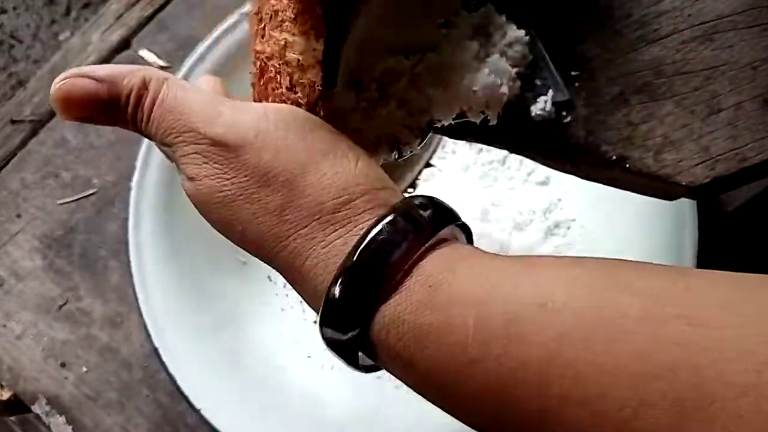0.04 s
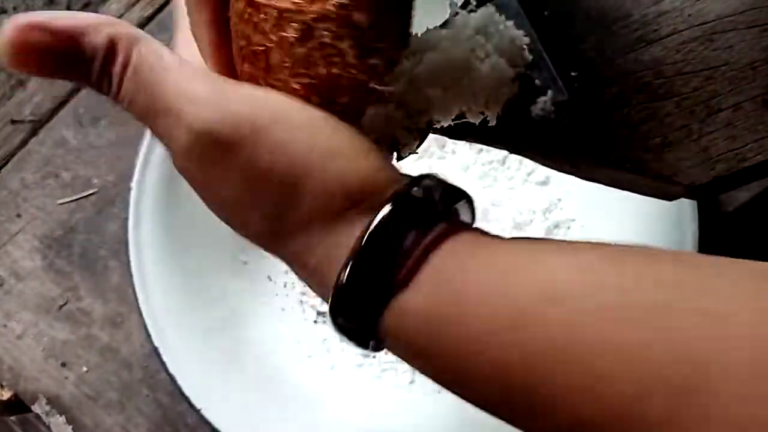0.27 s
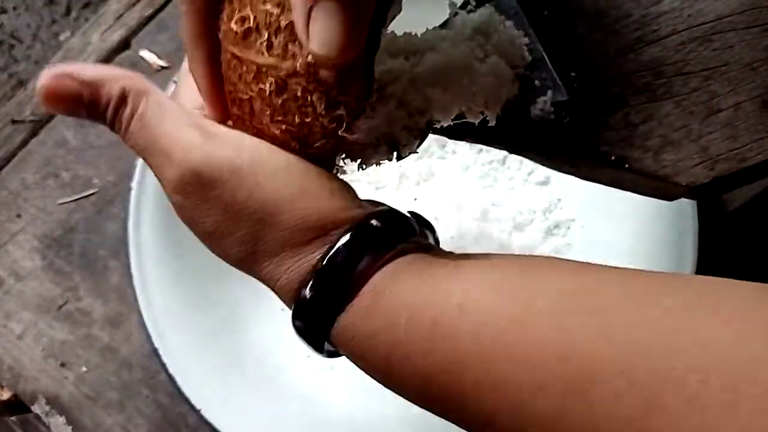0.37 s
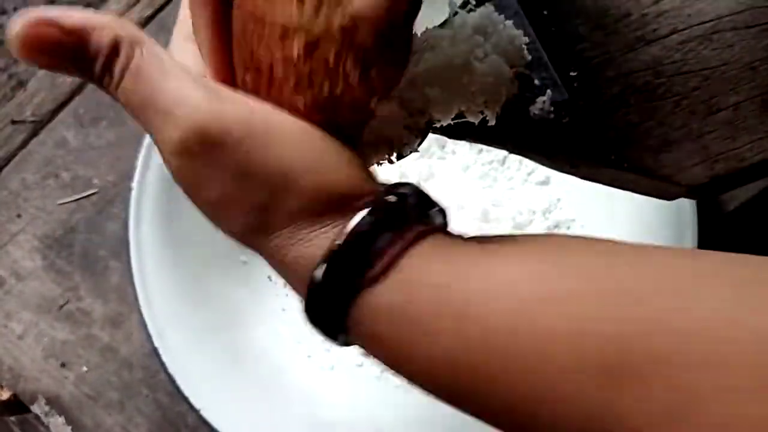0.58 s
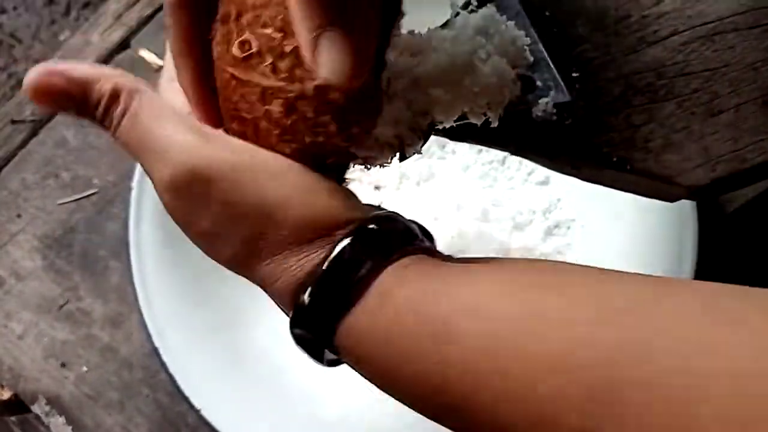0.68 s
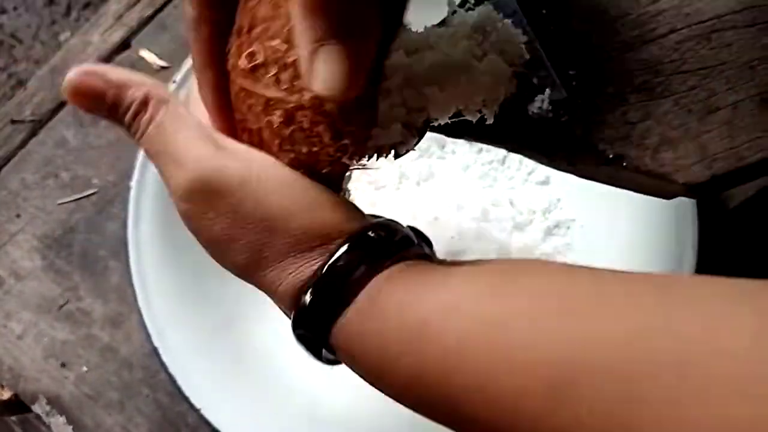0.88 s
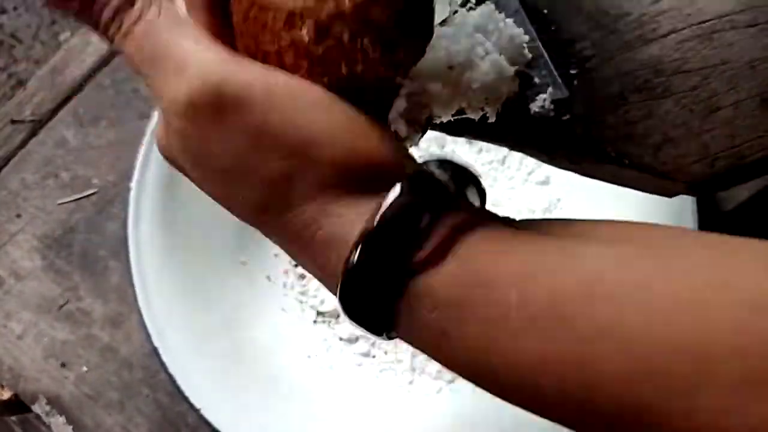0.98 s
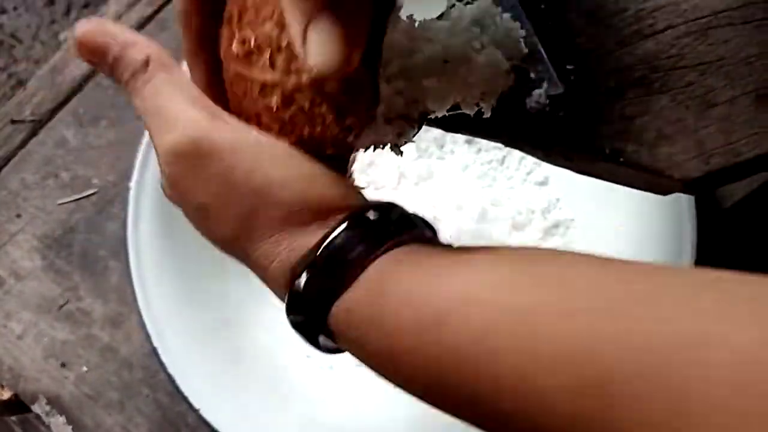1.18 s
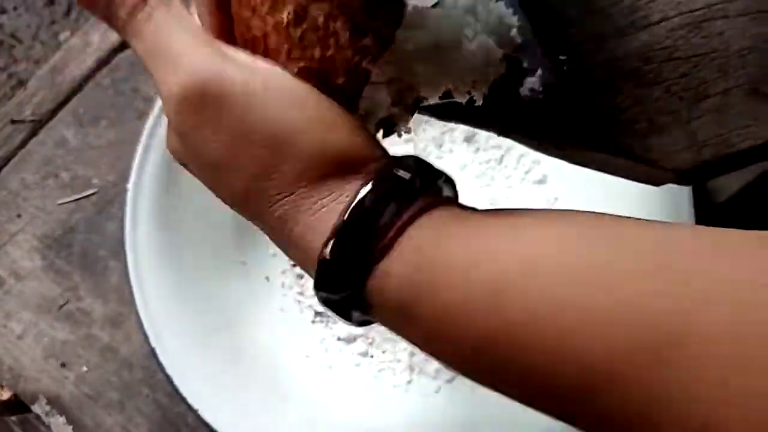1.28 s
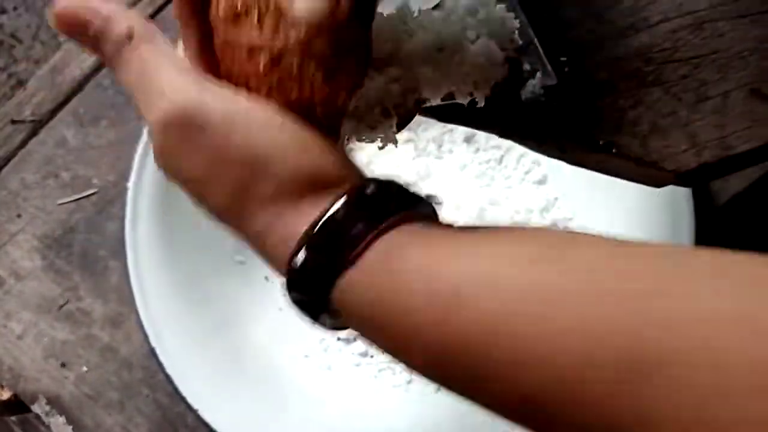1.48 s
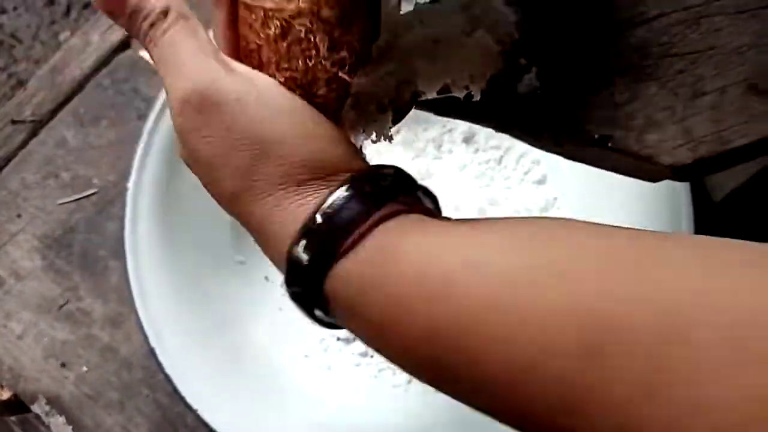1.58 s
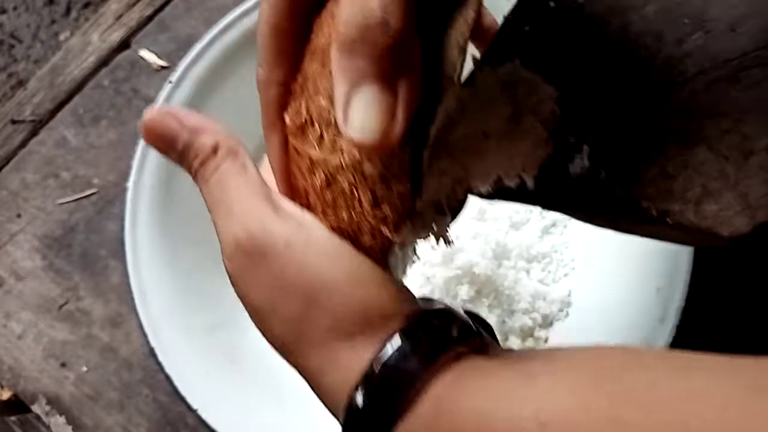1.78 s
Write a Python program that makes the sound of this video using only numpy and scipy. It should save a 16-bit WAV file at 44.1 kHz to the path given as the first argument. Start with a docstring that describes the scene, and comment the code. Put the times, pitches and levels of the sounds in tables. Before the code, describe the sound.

Coconut grating up close: six short, gritty scrapes on a serrated metal blade, with dull bench thuds

```python
"""A light scrape and a touch-down, then six rasping pushes: half a coconut over a toothed steel blade on a
wooden bench, close to a two-port recorder. Dense random clicks in hiss, coloured as torn flesh, drive modes of
shell, bench, cup and blade. Light landings and drags fall around the pushes; short pulses make the knocks.
Faint gliding sines squeak, a last rustle of fine grains fades; a short noise-tail room and faint air lie under."""
import sys
import numpy as np
from scipy import signal
from scipy.fft import rfft, irfft, next_fast_len
from scipy.io import wavfile
from scipy.ndimage import uniform_filter1d

SR = 44100
rng = np.random.default_rng(int(sys.argv[2]) if len(sys.argv) > 2 else 0)


def decibels_to_gain(level_db):
    """Convert a level in decibels to a linear amplitude gain (20 dB per decade)."""
    exponent = np.asarray(level_db, float) / 20
    return 10 ** exponent


def to_wav(sig):
    """Store sig (one row per channel, or 1-D mono) as 16-bit WAV at the path in sys.argv[1].

    Samples outside -1..1 are clipped; the rate is SR.
    """
    pcm = np.clip(np.atleast_2d(sig), -1, 1) * 32767
    pcm = np.round(pcm).astype(np.int16)
    wavfile.write(sys.argv[1], SR, pcm.T)  # frames by channels


N = 81585

# Levels are relative: port gain and filters follow. Spectra and modes are scaled to energy 1.
# Air noise spectrum: f/Hz, level/dB per Hz
AIR_SPECTRUM = [(30, -4), (150, 0), (400, -6), (1200, -14), (3000, -17), (9000, -15), (15500, -22)]
AIR_DB = -80
# Room decay: f/Hz, t60/s
ROOM_T60 = [(150, 0.2), (600, 0.4), (1300, 0.15), (2000, 0.28), (10000, 0.13)]
ROOM_DB = -15.5

# Last rustle spectrum: f/Hz, level/dB per Hz
SETTLE_SPECTRUM = [(100, -1.5), (350, -1.5), (700, -13.5), (1150, -11), (1450, -19), (2300, -22),
                   (3300, -31), (5000, -26.5), (9000, -26), (11000, -36), (15000, -42)]
SETTLE_START_S, SETTLE_RISE_S, SETTLE_DB, SETTLE_FADE_DB_PER_S = 1.59, 0.018, -55, -46

# Faint thin tones, perhaps shell squeaks: start/s, length/s, first f/Hz, last f/Hz, level/dB
SQUEAKS = [(.684, .024, 1020, 1060, -41), (1.105, .045, 940, 1140, -62), (1.315, .12, 2960, 2945, -56),
           (1.385, .04, 990, 1120, -65), (1.715, .035, 990, 1280, -64), (1.742, .1, 1280, 1215, -62),
           (1.824, .02, 1190, 1185, -56)]
SQUEAK_WAVER_RMS, SQUEAK_FADE_DB_PER_CYCLE = 0.25, -0.04

# Blows: t/s, level/dB
KNOCKS = [(0.23, -33.5), (0.494, -39), (.702, -37.5), (.748, -29.5), (.932, -35.5), (1.199, -21),
          (1.831, -65.5)]
KNOCK_WIDTH_S, KNOCK_CUP_DB = 0.00059, -12.5

# Shell modes: f/Hz, level/dB, t60/s
SHELL_MODES = [(147, -18, .08), (205.4, -19.5, 0.034), (279.2, -1, 0.069), (288, 3, 0.066),
               (409.7, 0, 0.034), (360.2, 2.5, 0.011), (459, -2, 0.067), (612, -10.5, 0.038)]
# Bench modes: f/Hz, level/dB, t60/s
BENCH_MODES = [(60, -1, .3), (74, 11, 0.1), (117.5, -6.5, .3), (143.4, -1, 0.75), (174.7, -3, 0.76),
               (218.2, -4.5, .3), (250.3, 20.5, 0.36), (346, -36, .25), (413, -28, 0.21)]
BENCH_DB = -8.5
# Hollow cup modes: f/Hz, level/dB, t60/s
CUP_MODES = [(1080, -7.5, 0.046), (1238, -1.5, 0.023), (1298.4, -1, 0.026), (1365, -1.5, 0.023)]
PUSH_CUP_DB = -4.5
# Blade modes: f/Hz, level/dB, t60/s
BLADE_MODES = [(1817, -2.5, 0.053), (2168, -2, 0.048), (2670, -4, 0.0067), (4230, -10, 0.004),
               (6570, 6, .006), (7940, 2, 0.013), (8970, 7, 0.0034)]
BLADE_DB = -5.5

# Pushes, one list each: t/s, tearing level/dB, shell load/dB over the tearing (capped below)
PUSHES = [
    [(0.2, -34, 2.5), (0.21, -43, 4), (0.22, -39, 2.5), (0.256, -35, 4.5), (0.28, -40.5, 4),
     (0.305, -77, 3)],
    [(0.415, -44, -20), (0.423, -46.5, 2), (0.447, -38.5, 2), (0.507, -32, 2.5), (0.531, -39.5, 2),
     (0.57, -77, 20)],
    [(0.675, -46.5, -25), (0.685, -40.5, 4.5), (0.703, -38.5, 5), (0.731, -31, -2.5), (0.759, -32, 6),
     (0.791, -42, 0.5), (0.821, -80, 10), (0.83, -69, 20)],
    [(0.93, -52.5, -24), (0.94, -44, 15.5), (0.956, -35, 0), (1.008, -30.5, 2.5), (1.04, -38, 2.5),
     (1.085, -75.5, 3)],
    [(1.2, -44, 67), (1.23, -34.5, -30), (1.242, -31, -2), (1.272, -32, 1.5), (1.308, -38, 4),
     (1.36, -74, 14.5)],
    [(1.465, -40, 12), (1.475, -45, 0), (1.559, -36, 5.5), (1.587, -46.5, 9), (1.595, -72, 18),
     (1.615, -66, 33)],
]
SHELL_LOAD_MAX_DB = 14
# Nut set on the blade before a push: start/s, length/s, level/dB, shell/dB over it
LANDINGS = [(0.157, 0.043, -48.5, 4), (0.644, 0.03, -57.5, 7.5), (0.9, 0.017, -48.5, 5.5),
            (1.158, 0.027, -46.5, 4), (1.432, 0.019, -49.5, -2.5)]
# Nut dragged back or turned lightly: start/s, length/s, level/dB, cup/dB over it, shell/dB over it
DRAGS = [(0.032, 0.059, -55, 1.5, 0), (0.319, 0.055, -44.5, -2, -4), (0.386, 0.014, -46, -10, -2),
         (0.573, 0.023, -43.5, 2, -6.5), (0.832, 0.012, -49.5, 4.5, -11), (1.092, 0.019, -54, -0.5, -4.5),
         (1.362, 0.024, -52, -2.5, -12)]
TOUCH_RISE_S, TOUCH_LIFT_TAU_S, TOUCH_FADE_DB_PER_S = 0.006, 0.0055, -45
# Tearing spectrum: f/Hz, level/dB per Hz
TEAR_SPECTRUM = [(100, -37), (500, -23.5), (750, -5), (1050, -0.5), (1500, -3.5), (1900, 3.5), (2450, -4),
                 (2900, -8), (3400, -8.5), (4400, -7), (5900, -6), (7500, -8), (9000, -5), (10400, -10.5),
                 (11500, -14.5), (12500, -14.5), (13800, -13.5), (14600, -10), (15500, -10.5)]
# Light drag spectrum: f/Hz, level/dB per Hz
RUB_SPECTRUM = [(100, 6), (400, -1.5), (750, -9), (1100, -10), (1700, -33), (2300, -12), (2900, -15.5),
                (3500, -9.5), (4300, -20.5), (4650, -0.5), (5000, -11.5), (6500, -8), (9000, -10),
                (10500, -14), (13500, -21), (15200, -11)]
CLICKS_PER_S, CLICK_SPREAD_DB, HISS_SHARE = 5000, 8.5, 0.63
JUDDER_RMS_DB, JUDDER_CUTOFF_HZ = 0.5, 162
PATCH_RMS_DB, PATCH_BINS, PATCH_FRAMES = 3, 3, 20

# Port level difference: f/Hz, left over right/dB
LEFT_OVER_RIGHT = [(60, -4.5), (600, -8.5), (1000, -3.5), (1300, -17.5), (1700, 4.5), (2150, -16),
                   (2600, 2), (4000, -2), (6800, -3.5), (7800, -17.5), (9000, -12), (10400, -10),
                   (12000, -24.5), (13500, -35), (15000, -37)]
# Port likeness: f/Hz, share of the right-port signal in the left (0-1)
LIKENESS = [(40, .85), (200, .98), (600, .92), (800, .4), (1000, .7), (1350, .4), (1600, .85), (2600, .9),
            (3100, .45), (4100, .75), (5000, .35), (9000, .3)]
# Left port lead: f/Hz, phase/rad
LEFT_LEAD = [(0, 0), (650, 3.1), (900, 4.8), (1250, 4.6), (1600, 3.5), (2150, 3.4), (2400, 6.1), (2900, 8),
             (4100, 12.6), (4300, 12.9), (16000, 60)]
PORT_GAIN_DB, LOW_CUT_HZ, TOP_CUT_HZ = 4.5, 100, 15760


def evened(x):
    """Scales to rms 1."""
    return x / np.sqrt(np.mean(x ** 2) + 1e-20)


def read(points, hz):
    """Reads a table on a log-frequency axis."""
    f, value = np.transpose(points)
    return np.interp(np.log(hz + 1), np.log(f + 1), value)


def coloured(x, points):
    """Minimum-phase filter with the given spectrum, energy 1."""
    level_db = read(points, np.fft.rfftfreq(4096, 1 / SR))
    cepstrum = irfft(np.log(decibels_to_gain(level_db)))
    # fold to the causal side
    cepstrum[1:2048] *= 2
    cepstrum[2049:] = 0
    taps = irfft(np.exp(rfft(cepstrum)))[:2048]
    return signal.oaconvolve(x, taps[None] / np.linalg.norm(taps), axes=1)[:, :N]


def rung(x, modes):
    """A force excites decaying sine modes of alternating sign; whole response has energy 1."""
    t = np.arange(20000) / SR
    ring = np.zeros(len(t))
    for k, (hz, db, t60) in enumerate(modes):
        decay = decibels_to_gain(db - 60 * t / t60) / np.sqrt(t60)
        ring += (-1) ** k * decay * np.sin(2 * np.pi * hz * t)
    return signal.oaconvolve(x, ring[None] / np.linalg.norm(ring), axes=1)[:, :N]


def grit():
    """Two unrelated streams of tooth clicks over hiss, sharing one quick judder."""
    hit = rng.random((2, N)) < CLICKS_PER_S / SR
    size = np.minimum(rng.exponential(1, (2, N)), 4)
    sign = np.sign(rng.standard_normal((2, N)))
    hiss = rng.standard_normal((2, N))
    clicks = evened(hit * decibels_to_gain(CLICK_SPREAD_DB * size) * sign)
    lowpass = signal.butter(2, JUDDER_CUTOFF_HZ, fs=SR)
    judder = evened(signal.lfilter(*lowpass, rng.standard_normal(N)))
    return evened((HISS_SHARE * hiss + (1 - HISS_SHARE) * clicks) * decibels_to_gain(JUDDER_RMS_DB * judder))


def patchy(x):
    """Bands swell and sink as different teeth bite."""
    z = signal.stft(x, nperseg=256, noverlap=192)[2]
    field = rng.standard_normal(z.shape[1:])
    field = uniform_filter1d(field, size=PATCH_BINS, axis=0)
    field = evened(uniform_filter1d(field, size=PATCH_FRAMES, axis=1))
    return evened(signal.istft(z * decibels_to_gain(PATCH_RMS_DB * field), nperseg=256, noverlap=192)[1][:, :N])


def air():
    """Steady coloured noise, unrelated in the two rows."""
    return decibels_to_gain(AIR_DB) * coloured(rng.standard_normal((2, N)), AIR_SPECTRUM)


def room(x):
    """Convolves with a noise tail, each band dying at its own speed."""
    hz, t, z = signal.stft(rng.standard_normal((2, SR // 2)), SR, nperseg=256)
    decay = decibels_to_gain(-60 * t / read(ROOM_T60, hz)[:, None])
    tail = signal.istft(z * decay, SR, nperseg=256)[1]
    return signal.fftconvolve(x, tail / np.linalg.norm(tail[0]), axes=1)[:, :N]


def settling():
    """Fine grains fading out once the nut is lifted."""
    u = np.arange(N) / SR - SETTLE_START_S
    fade = decibels_to_gain(SETTLE_DB + SETTLE_FADE_DB_PER_S * np.maximum(u, 0))
    return coloured(patchy(grit()) * np.clip(u / SETTLE_RISE_S, 0, 1) * fade, SETTLE_SPECTRUM)


def squeaks():
    """Thin sines with linear pitch glides and slightly unsteady level."""
    t, tones = np.arange(N) / SR, np.zeros(N)
    for start, length, first_hz, last_hz, db in SQUEAKS:
        u = np.clip((t - start) / length, 0, 1)
        cycles = length * (first_hz * u + (last_hz - first_hz) * u ** 2 / 2)
        edges = np.minimum(2 * abs(np.sin(np.pi * u)), 1) * (u < 1)
        tones += decibels_to_gain(db + SQUEAK_FADE_DB_PER_CYCLE * cycles) * edges * np.sin(2 * np.pi * cycles)
    waver = evened(uniform_filter1d(rng.standard_normal((2, N)), size=300, axis=1))
    return tones * (1 + SQUEAK_WAVER_RMS * waver)


def knocks():
    """Short soft blows with a rebound ring shell and bench; their slope rings the cup."""
    force, t = np.zeros((2, N)), np.arange(N) / SR
    for s, db in KNOCKS:
        u = ((t - s) / KNOCK_WIDTH_S) ** 2
        force += decibels_to_gain(db) * (2 * u - 1) * np.exp(-u)
    slope = np.gradient(force, axis=1) * KNOCK_WIDTH_S * SR
    wood = rung(force, SHELL_MODES) + decibels_to_gain(BENCH_DB) * rung(force, BENCH_MODES)
    return wood + decibels_to_gain(KNOCK_CUP_DB) * rung(slope, CUP_MODES)


def touch(t, start, length, db):
    """Contact envelope: quick rise, slow fade, quick lift."""
    u = t - start
    edges = np.clip(u / TOUCH_RISE_S, 0, 1) * np.exp(-np.maximum(u - length, 0) / TOUCH_LIFT_TAU_S)
    return edges * decibels_to_gain(db + TOUCH_FADE_DB_PER_S * np.clip(u, 0, length))


def contact():
    """Gains over time with which tearing, light rub, shell and cup are driven."""
    t = np.arange(N) / SR
    tear, rub, shell, cup = np.zeros((4, N))
    for push in PUSHES:
        s, db, load_db = np.transpose(push)
        edges = np.clip(np.minimum(t - s[0], s[-1] - t) / TOUCH_RISE_S, 0, 1)
        level = decibels_to_gain(np.interp(t, s, db)) * edges
        tear += level
        shell += level * decibels_to_gain(np.minimum(np.interp(t, s, load_db), SHELL_LOAD_MAX_DB))
        cup += level * decibels_to_gain(PUSH_CUP_DB)
    for start, length, db, shell_db in LANDINGS:
        level = touch(t, start, length, db)
        tear += level
        shell += level * decibels_to_gain(shell_db)
        cup += level * decibels_to_gain(PUSH_CUP_DB)
    for start, length, db, cup_db, shell_db in DRAGS:
        level = touch(t, start, length, db)
        rub += level
        shell += level * decibels_to_gain(shell_db)
        cup += level * decibels_to_gain(cup_db)
    return tear, rub, shell, cup


def grating():
    """The tooth clicks heard directly and through shell, bench, cup and blade."""
    tear, rub, shell, cup = contact()
    teeth, body = patchy(grit()), grit() * shell
    direct = coloured(teeth * tear, TEAR_SPECTRUM) + coloured(teeth * rub, RUB_SPECTRUM)
    wood = rung(body, SHELL_MODES) + decibels_to_gain(BENCH_DB) * rung(body, BENCH_MODES)
    steel = decibels_to_gain(BLADE_DB) * rung(patchy(grit()) * tear, BLADE_MODES)
    hollow = rung(patchy(grit()) * cup, CUP_MODES)
    return direct + wood + steel + hollow


def scene():
    """Row 0 feeds the right port; row 1 is a twin for the part the left port does not share."""
    near = grating() + knocks()
    return near + decibels_to_gain(ROOM_DB) * room(near) + squeaks() + settling() + air()


def low_pass(x):
    """Removes everything above the highest recorded frequency."""
    return signal.sosfilt(signal.butter(12, 16390, fs=SR, output="sos"), x)


def record(dry):
    """The left port leads in phase, is duller and only partly alike; both lose deep bass and top."""
    size = next_fast_len(N + 2048)
    hz, (near, twin) = np.fft.rfftfreq(size, 1 / SR), rfft(dry, size)
    same = np.clip(read(LIKENESS, hz), 0, 1)
    left = same * near + np.sqrt(1 - same ** 2) * twin
    lead_rad = np.interp(hz, *np.transpose(LEFT_LEAD))
    left = left * decibels_to_gain(read(LEFT_OVER_RIGHT, hz)) * np.exp(1j * lead_rad)
    top_cut = 1 + (hz / TOP_CUT_HZ) ** 160
    pair = irfft(np.array([left, near]) / top_cut, size)[:, :N]
    pair = signal.sosfilt(signal.butter(4, LOW_CUT_HZ, "high", fs=SR, output="sos"), pair)
    mix = decibels_to_gain(PORT_GAIN_DB) * pair
    return low_pass(mix)


dry = scene()
out = record(dry)
to_wav(out)
```